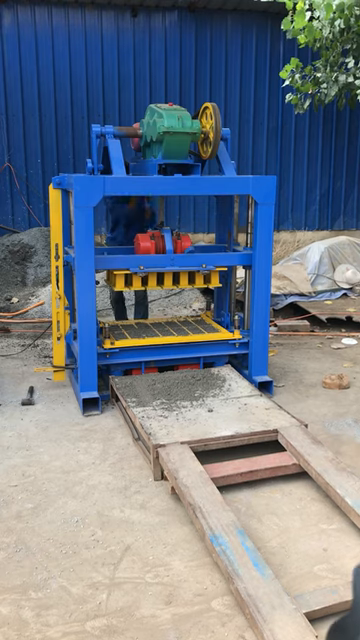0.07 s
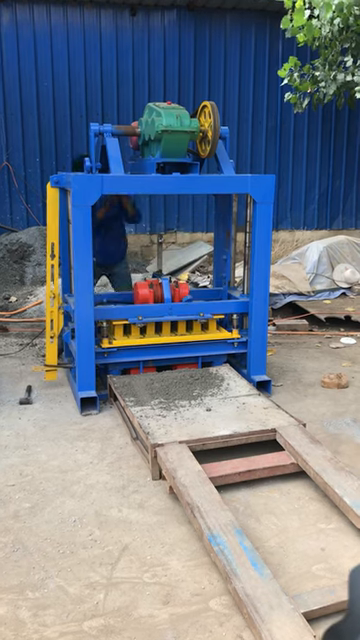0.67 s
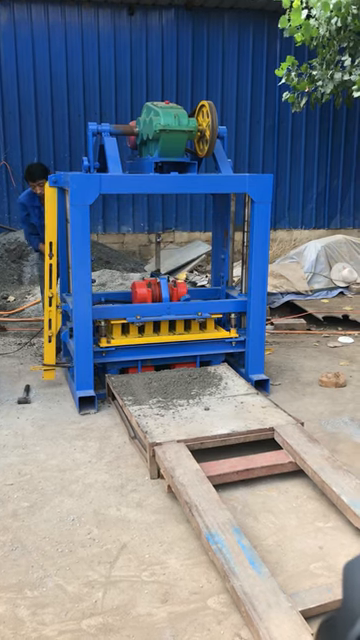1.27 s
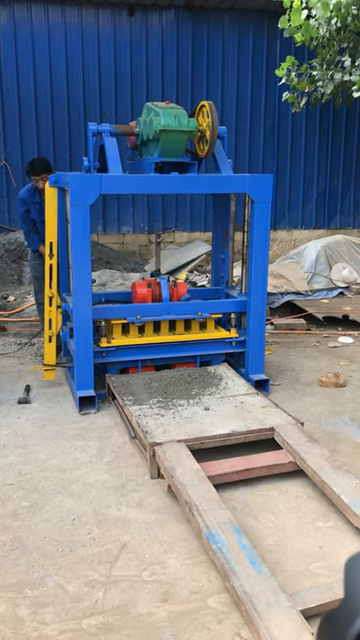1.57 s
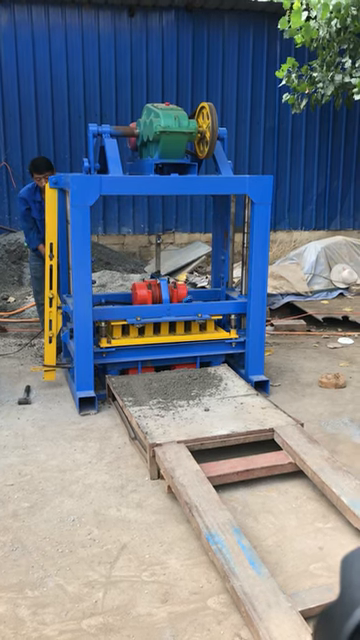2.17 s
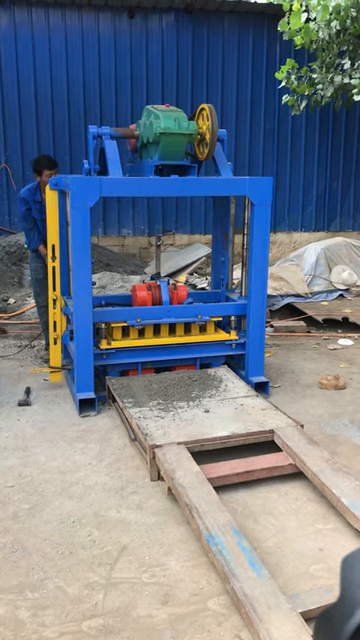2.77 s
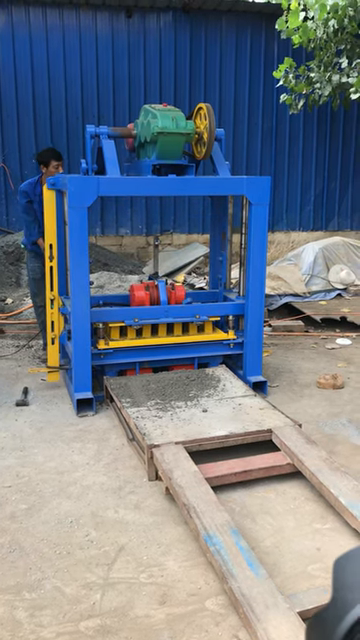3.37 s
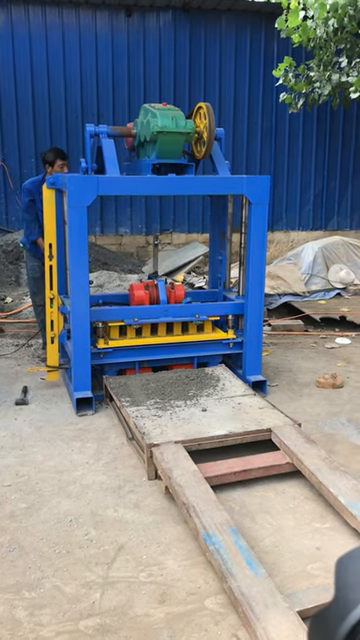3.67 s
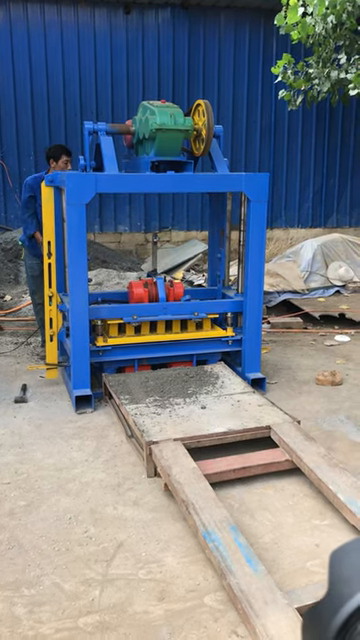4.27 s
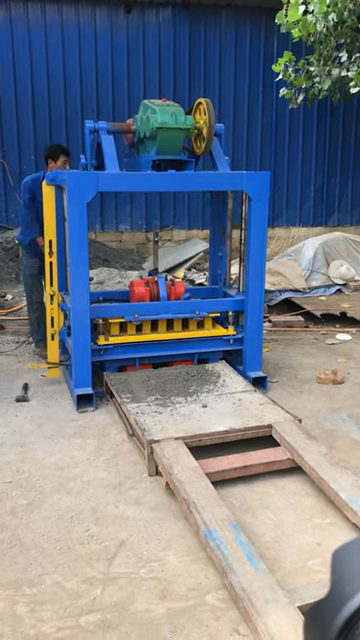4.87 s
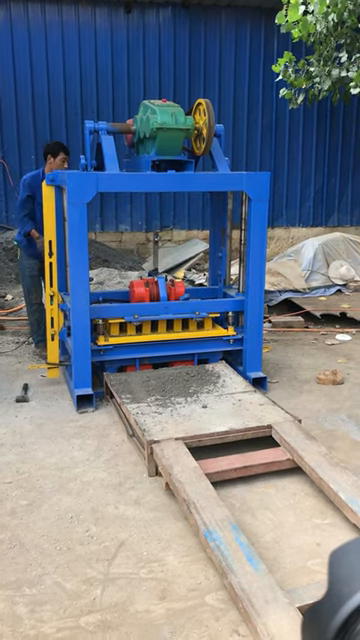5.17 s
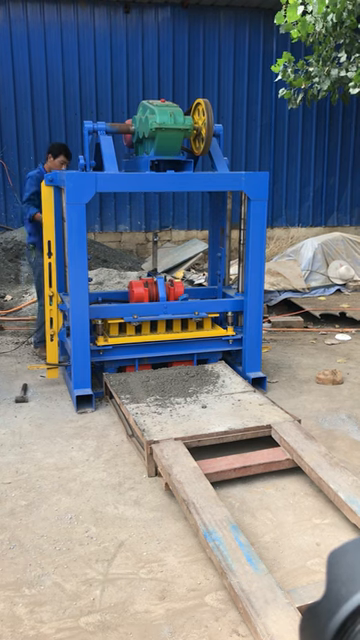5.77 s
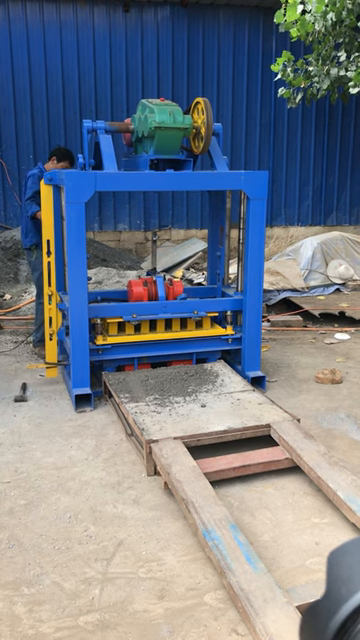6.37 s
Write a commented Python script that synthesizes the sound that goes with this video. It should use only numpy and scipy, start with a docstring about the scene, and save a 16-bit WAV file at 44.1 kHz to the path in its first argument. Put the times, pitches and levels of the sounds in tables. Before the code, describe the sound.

A catch clicks and a steel press head clanks against its guides, then crashes into the mould of a block machine at about 0.5 seconds with a low thud and a few ringing bounces. The ringing fades into faint outdoor noise and a low hum. Around 1.5 seconds, vibration motors start with a short rising scrape and several knocks. From 1.7 seconds they produce a loud, fast, hammering buzz, with steel parts chattering along. The buzz turns rougher, and from about 3.2 seconds the motors coast down, leaving looser rattling and irregular ringing knocks. A second short, loud burst of vibration comes at about 4.7 seconds. From 5 seconds it winds down again into thinning clatter and scattered clanks, still fading at the end, around 6.6 seconds. A short echo from the yard's metal fence follows the sounds.

```python
"""A yard with a concrete block machine. Its press head drops into the mould with steel clanks.
The vibration motors then run, coast down, get a second short burst and coast again. Their
off-centre weights slam the mould table once a turn and shake the loose parts of the frame,
which rattle, knock and ring. A sheet-metal fence echoes it all over faint outdoor noise."""
import sys
import numpy as np
from scipy import signal
from scipy.fft import rfft, irfft, next_fast_len
from scipy.io import wavfile
from scipy.ndimage import uniform_filter1d, minimum_filter1d, map_coordinates

SR = 44100
rng = np.random.default_rng(int(sys.argv[2]) if len(sys.argv) > 2 else 0)


def pcm_store(signal):
    """Save signal as 16-bit PCM."""
    levels = np.round(np.clip(np.atleast_2d(signal), -1, 1) * 32767)
    wavfile.write(sys.argv[1], SR, levels.astype(np.int16).T)


N = 291942
SWITCH_ON_S, FIRST_SLAM_S = 1.44, 1.675

# Motor speed. Each row: time in seconds, turns per second.
SPEED_HZ = [(1.5, 0), (1.6, 25), (1.675, 39), (1.73, 44), (1.76, 47.4), (3.15, 47.3), (3.25, 45), (3.5, 33),
            (4.0, 22.7), (4.5, 17), (4.6, 30), (4.7, 46), (4.87, 46.5), (5.05, 36), (5.5, 26), (6.1, 17),
            (6.62, 12.5)]

def shaft():
    """Turns made by the weights; a landing falls on each whole number."""
    turns = np.cumsum(curve(SPEED_HZ)) / SR
    return turns - turns[round(FIRST_SLAM_S * SR)] % 1

def in_step(start_s=1.818, beat_hz=5.2, slowing_s=0.302):
    """The motors beat ever more slowly: +1 pulling together, -1 opposed."""
    age_s = np.maximum(clock() - start_s, 0)
    return np.cos(2 * np.pi * beat_hz * slowing_s * np.log1p(age_s / slowing_s))

# Run-ups. Each row: peak time in seconds, boost in dB, then rise, hold and settling in seconds.
SURGES = [(1.663, 5, 0.044, 0.055, 0.75), (4.754, 7.5, 0.19, 0.061, 0.19)]

def surge_db():
    """Each run-up throws the machine hard before it settles."""
    t, boost_db = clock(), np.zeros(N)
    for peak_s, db, rise_s, hold_s, settle_s in SURGES:
        rise = np.clip(1 + (t - peak_s) / rise_s, 0, 1)
        boost_db += db * rise * np.exp(-np.maximum(t - peak_s - hold_s, 0) / settle_s)
    return boost_db

def shaken(law):
    """Gain of a part from speed and surge; it dies away when the shaking is too slow to lift it."""
    full_db, doubling_db, surge_share, stall_hz, stall_db_per_hz = law
    speed_hz = np.maximum(curve(SPEED_HZ), SPEED_HZ[-1][1])
    db = full_db + doubling_db * np.log2(speed_hz / speed_hz.max()) + surge_share * surge_db()
    db -= stall_db_per_hz * np.maximum(stall_hz - speed_hz, 0)
    return amp(db) * (clock() > SWITCH_ON_S)

def each_turn(turns, rise_s, t60_s, scatter_db, steady):
    """Envelope of rms 1 that jumps at each landing and decays over a steady floor."""
    age_s = turns % 1 / np.maximum(curve(SPEED_HZ), 1)
    strength = amp(scatter_db * rng.standard_normal(N))[np.floor(turns).astype(int)]
    pulses = strength * (1 - np.exp(-age_s / rise_s)) * amp(-60 * age_s / t60_s)
    return unit(unit(pulses) + steady)

# Unusual landings. Each row: time in seconds, gain in dB.
ACCENTS = [(1.685, 5.5), (1.71, 6), (2.598, 5), (2.687, 2), (2.728, 2.5), (2.96, 4.5), (3.107, 2.5),
           (3.128, 3.5), (3.17, 0), (3.41, 4), (3.49, 5), (4.93, -6), (4.955, 4), (5.003, 2.5),
           (5.058, 3.5)]

def accents(turns):
    """Gain held for the whole turn when the table lands harder or softer than usual."""
    turn = np.floor(turns)
    return amp(sum(db * (turn == turn[round(s * SR)]) for s, db in ACCENTS))

# Unevenness of the landings. Each row: time in seconds, roughness from 0 to 1.
UNEVENNESS = [(1.68, .7), (1.77, .06), (2.5, .04), (2.65, .16), (2.85, .14), (3.1, .55), (3.4, .9),
              (4.7, .6), (4.85, .45), (5.2, .9)]
# Resonances of the table plate and the heavy base. Each row: centre in Hz, width in Hz, level in dB.
PLATE_MODES = [(545, 52, 2.5), (610.4, 42, -4.5), (667.5, 37, 5.5), (700, 10, -5.5), (840, 77, 0.5)]
BASE_MODES = [(160, 24, -8.5), (296, 37, 0.5), (354, 29, -11)]
# Response to the motors. Each law: level at full speed in dB, dB per doubling of speed,
# surge factor, stall speed in Hz, dB lost per Hz below it.
PLATE_LAW = (-25.5, 23.5, 1.27, 31.5, 20)
BASE_LAW = (-25.5, 15.5, 1.1, 34.5, 3.5)

def mould_table(turns, lag_s=0.00368, jitter_s=0.00027, rebound_share=0.43, heave_db=1.5, tip_db=0.2):
    """One slam a turn, part clean blow and part scattered rebounds, rings the table and its base."""
    turns = turns - lag_s * curve(SPEED_HZ)  # the heavy table trails the light parts
    landings = np.flatnonzero(np.diff(np.floor(turns)) > 0)
    lateness, strength_db = rng.standard_normal((len(landings), 2)).T
    landings += np.round(lateness * jitter_s * SR).astype(int)
    blows = np.zeros(N)
    blows[np.clip(landings, 0, N - 1)] = amp(strength_db)
    rebounds = each_turn(turns, rise_s=0.0058, t60_s=0.07, scatter_db=2.2, steady=0.12)
    rebounds *= rng.standard_normal(N)
    force = np.sqrt(1 - rebound_share) * unit(blows) + np.sqrt(rebound_share) * rebounds
    # the plate radiates little outside its own band
    plate = shaped(force, lambda hz: resonances(PLATE_MODES, hz) * band(hz, 583, width_hz=137))
    base = shaped(rebounds * np.sqrt(curve(UNEVENNESS)),
                  lambda hz: resonances(BASE_MODES, hz) * band(hz, 231, width_hz=700))
    # in step the motors heave the base; out of step they tip the table
    heave, tip = amp(heave_db * in_step()), amp(-tip_db * in_step())
    return accents(turns) * (shaken(PLATE_LAW) * tip * plate + shaken(BASE_LAW) * heave * base)

# Shaking force. Each row: multiple of the motor speed, relative level in dB.
FORCE_HARMONICS = [(1, -41), (2, -44), (3, -33), (4, -32), (5, -32), (6, -25), (7, -31), (8, -35), (9, -42),
                   (10, -39)]

def weights(turns, level_db=-3, beat_db=3.0, surge_share=1.38):
    """The unbalanced force falls steeply as the motors slow; its overtones need even landings."""
    speed_hz, evenness = curve(SPEED_HZ), 1 - curve(UNEVENNESS)
    pull = amp(level_db + beat_db * in_step() + surge_share * surge_db())
    pull *= (speed_hz / speed_hz.max()) ** 6
    return pull * sum(amp(db) * (evenness if k > 1 else 1) * np.sin(2 * np.pi * (k * turns + rng.random()))
                      for k, db in FORCE_HARMONICS)

# Spectrum of the loose parts. Each row: frequency in Hz, relative level in dB.
PARTS_SPECTRUM = [(350, -29.5), (520, -5), (640, 3.5), (850, -6), (1200, -1), (1700, -9), (2200, -5),
                  (3000, -12), (3900, -16), (5000, -23.5), (8000, -43.5), (15500, -68)]
# Frame resonances. Each row: centre in Hz, width in Hz, level in dB.
FRAME_MODES = [(894, 98, 0.5), (1250, 4.3, 6.5), (1337, 67, -4.5), (1550, 160, 6), (1712, 56, 8.5),
               (2070, 62, 3), (2315, 31, 1.5), (2830, 13, 5), (3130, 40, 4), (3720, 14, 4)]

def steel(hz, ring_db=-3):
    """Broad colour of the loose parts with the frame's resonances on top."""
    return spectrum(PARTS_SPECTRUM, hz) * (1 + amp(ring_db) * resonances(FRAME_MODES, hz))

def steel_ripple(depth_db, spacing_hz=60):
    """Fine ripple against frequency: the many small resonances of welded steel."""
    grid_hz = np.arange(0, SR / 2, spacing_hz)
    treble = np.clip(grid_hz / 2500 - 0.5, 0, 1)
    gain = amp(depth_db * rng.standard_normal(SR // 10)[:len(grid_hz)] * treble)
    gain /= np.sqrt(uniform_filter1d(gain ** 2, size=7))
    return lambda hz: np.interp(hz, grid_hz, gain)

# Spectrum of sharp steel edges. Each row: frequency in Hz, relative level in dB.
EDGE_SPECTRUM = [(1760, -17), (3000, -4.5), (4880, -13.5), (5570, -10), (7670, -21.5), (9000, -20.5),
                 (10300, -27), (12700, -24.5), (15800, -33)]
# Response of the parts and their edges to the motors; columns as in PLATE_LAW.
RATTLE_LAW = (-27, 5.5, 1.55, 17.5, 1.5)
EDGE_LAW = (-35, 18, 1.23, 26, 10)

def loose_parts(turns, flutter_db=0.76, edge_steady=0.2, accent_share=0.35):
    """Steel parts chatter in time with the table at speed, and tumble freely as it slows."""
    locked = np.clip((curve(SPEED_HZ) - 27) / 17, 0, 1)
    chatter = each_turn(turns, rise_s=0.0025, t60_s=0.06, scatter_db=1.0, steady=0.3)
    tumble = each_turn(turns, rise_s=0.0052, t60_s=0.75, scatter_db=2.7, steady=0.9)
    tumble *= amp(flutter_db * wobble(rate_hz=16))
    drive = np.sqrt(locked * chatter ** 2 + (1 - locked) * tumble ** 2) * accents(turns) ** accent_share
    ripple = steel_ripple(depth_db=3.5)
    rattle = shaped(shaken(RATTLE_LAW) * drive * contacts(per_s=5000), lambda hz: steel(hz) * ripple(hz))
    # edges meet when the parts are thrown hard, and keep jingling between slams
    jingle = shaken(EDGE_LAW) * unit(drive + edge_steady) * contacts(per_s=13000)
    return rattle + shaped(jingle, lambda hz: spectrum(EDGE_SPECTRUM, hz) * ripple(hz))

# Spectrum of the rocking frame. Each row: frequency in Hz, relative level in dB.
ROCK_SPECTRUM = [(25, -11), (45, -14), (80, -0.5), (110, -5), (180, 4), (290, 0.5), (420, -6.5), (600, 3.5),
                 (1200, -62.5)]
# Its response to the motors; columns as in PLATE_LAW.
ROCK_LAW = (-39, -2, 0.9, 17.5, 2.5)

def frame_rocking():
    """Uneven landings rock the whole frame on its feet."""
    force = shaken(ROCK_LAW) * np.sqrt(curve(UNEVENNESS)) * rng.standard_normal(N)
    return shaped(force, lambda hz: spectrum(ROCK_SPECTRUM, hz))

# Modes of catch, guides, head and frame boom. Each row: frequency in Hz, level in dB, T60 in seconds.
CATCH_MODES = [(735, 4.5, 0.36), (1140, 10, 0.059), (1810, 2, 0.54), (2100, 2, 0.26), (2850, -5, 0.31),
               (3680, -22, .22), (4520, 0.5, 0.12), (5760, 0, 0.33), (8300, -17, 0.27), (9700, -16, 0.48),
               (12240, -12, 0.25), (14870, -24, .28)]
GUIDE_MODES = [(575, -0.5, 0.27), (639, -1, 0.26), (1163, -14, 0.4), (1600, -5, 0.086)]
HEAD_MODES = [(991, 9, 0.22), (1065, -11, 2.1), (1120, -15, 0.7), (1330, 3, 0.4), (1402, 10, 0.28),
              (1340, 3, 0.19), (2360, -12, 0.66), (2900, -13, 0.23), (3270, -3, 0.23), (3896, 6.5, 0.16),
              (6002, -20, 0.18), (7260, -21, 0.8), (9960, -7.5, 0.27), (14714, -21, .3)]
BOOM_MODES = [(80, -3, 0.23), (109, -2, 0.14), (144, -3, 0.08)]
# Hits on them. Each row: start in seconds, level in dB.
CATCH_HITS = [(0.083, -32)]
GUIDE_HITS = [(0.158, -18.5), (0.58, -16.5), (1.378, -35.5)]
HEAD_HITS = [(0.249, -22.5), (0.474, -34), (0.611, -26)]
BOOM_HITS = [(0.51, -13.5)]

def press_rings():
    """Catch, guides and head ring when struck; the frame booms as the head lands."""
    clanks = ring(CATCH_MODES, CATCH_HITS) + ring(GUIDE_MODES, GUIDE_HITS) + ring(HEAD_MODES, HEAD_HITS)
    return clanks + ring(BOOM_MODES, BOOM_HITS, attack_s=0.006, blur_hz=3)

# Blows of the head. Each row: start in seconds, crash in dB, thud in dB,
# treble tilt in dB per octave, rise in seconds, T60 in seconds.
HEAD_BLOWS = [(0.157, -25.5, -38, -12, 0.0085, 0.65), (0.248, -5.5, -53, -1.5, 0.00064, 0.2),
              (0.458, -10, -12, -4.5, 0.012, 0.29), (0.474, -15.5, -23.5, -1, 0.0051, 0.23),
              (0.503, 8, -4, -7, 0.0011, 0.034), (0.575, -16.5, -21, -5.5, 0.0072, 0.3),
              (0.610, -9.5, -20.5, -1.5, 0.00039, 0.23), (0.645, -12.5, -42, -6.5, 0.0016, 0.23)]
# Spectra of a blow. Each row: frequency in Hz, relative level in dB.
CRASH_SPECTRUM = [(350, -27), (600, -19.5), (845, -14.5), (996, -13), (1140, -8.5), (1420, -8),
                  (1770, -8.5), (4130, -14), (4870, -18), (5820, -17), (7760, -25.5), (9790, -25),
                  (15800, -28)]
THUD_SPECTRUM = [(18, -45), (30, -13), (90, 3.5), (140, -1.5), (241, -1), (328, 0), (395, -17), (572, 0),
                 (909, -16.5), (1200, -27), (1560, -37), (2640, -120)]

def press_blows(catch_db=-33.5):
    """The catch lets go; the head knocks on its guides, crashes into the mould and bounces."""
    release = burst(CATCH_HITS[0][0], rise_s=0.0003, t60_s=0.36) * rng.standard_normal(N)
    crashes = amp(catch_db) * shaped(release, lambda hz: np.sqrt(spectrum(CRASH_SPECTRUM, hz)))
    thuds, ripple = np.zeros(N), steel_ripple(depth_db=2.0)
    for start_s, crash_db, thud_db, tilt_db, rise_s, t60_s in HEAD_BLOWS:
        blow = burst(start_s, rise_s, t60_s)
        tilt = lambda hz: amp(tilt_db * np.log2(1 + hz / 1500))  # softer contacts excite less treble
        colour = lambda hz: spectrum(CRASH_SPECTRUM, hz) * tilt(hz) * ripple(hz)
        crashes += amp(crash_db) * shaped(blow * rng.standard_normal(N), colour)
        thuds += amp(thud_db) * blow
    return crashes + shaped(thuds * rng.standard_normal(N), lambda hz: spectrum(THUD_SPECTRUM, hz))

# Knocks of loose parts. Each row: start in seconds, relative level in dB, ring frequency in Hz.
KNOCKS = [(1.546, -18.5, 1137), (1.581, -12, 1657), (1.632, -10, 1120), (1.661, -4, 1647),
          (2.723, -17, 1380), (2.911, -12, 1495), (2.955, -18, 880), (3.098, -15, 870), (3.247, -12, 846),
          (3.396, -31, 1560), (3.578, -27, 1780), (3.853, -14, 1700), (3.948, -15.5, 991),
          (3.981, -12.5, 1674), (4.085, -13.5, 1700), (4.12, -14, 990), (4.154, -17.5, 1720),
          (4.188, -17, 985), (4.227, -15.5, 1690), (4.247, -13, 1250), (4.362, -14.5, 1027),
          (4.386, -17, 1710), (4.414, -14, 1693), (4.506, -19, 1636), (4.559, -16.5, 1065),
          (5.172, -13, 1313), (5.429, -18.5, 1320), (5.459, -17, 2000), (5.579, -18.5, 2080),
          (5.635, -15, 1624), (5.763, -17, 703), (5.831, -13, 1000), (5.908, -17.5, 1290),
          (5.993, -22, 985), (6.029, -13.5, 1470), (6.068, -17, 1334), (6.127, -15.5, 1600),
          (6.374, -16.5, 2116), (6.438, -23, 1230)]
# Light clicks. Each row: start in seconds, level in dB.
CLICKS = [(1.377, -39), (1.4, -41), (1.702, -33), (1.725, -26), (3.245, -36), (3.565, -37), (3.63, -42),
          (3.78, -42), (3.975, -38.5), (4.518, -36.5), (4.775, -27), (5.183, -34), (5.46, -40),
          (5.6, -41.5), (5.865, -47), (6.135, -47)]

def knocks(hit_db=-9, rebound_db=-21, ring_db=-11, ring_t60_s=0.23):
    """Parts knock on the frame, rebound and ring at their own pitch; small ones click more brightly."""
    blows = sum(amp(db + hit_db) * burst(s, rise_s=0.00076, t60_s=0.08)
                + amp(db + rebound_db) * burst(s, rise_s=0.012, t60_s=0.49) for s, db, _ in KNOCKS)
    clanks = shaped(blows * contacts(per_s=10000), lambda hz: steel(hz, ring_db=-0.5))
    taps = sum(amp(db) * burst(s, rise_s=0.00014, t60_s=0.22) for s, db in CLICKS)
    clicks = shaped(taps * contacts(per_s=3400), lambda hz: spectrum(EDGE_SPECTRUM, hz) * (1 + hz / 4000))
    rings = sum(ring([(hz, ring_db, ring_t60_s)], [(s, db)], blur_hz=60) for s, db, hz in KNOCKS)
    return clanks + clicks + rings

# Start-up rubs. Each row: peak time and half-width in seconds, level in dB, centre and width in Hz.
RUBS = [(1.514, 0.089, -40, 620, 300), (1.538, 0.03, -40, 930, 250), (1.568, 0.016, -29, 1260, 700)]

def motor_rub():
    """The motors rub as they start: a scrape that climbs in pitch."""
    out = np.zeros(N)
    for peak_s, half_width_s, db, centre_hz, width_hz in RUBS:
        swell = amp(db) * np.exp(-((clock() - peak_s) / half_width_s) ** 2)
        colour = lambda hz: band(hz, centre_hz, width_hz) * band(hz, centre_hz, 2 * centre_hz)
        out += shaped(swell * contacts(per_s=7500), colour)
    return out

# Whistle of the sliding head. Each row: time in seconds, pitch in Hz, level in dB.
WHISTLE = [(0.37, 5500, -62), (0.4, 5950, -49), (0.45, 7500, -46), (0.465, 7900, -62)]

def head_slide(jitter=0.22):
    """Steel running on steel: a faint, unsteady whistle that rises as the head gathers speed."""
    pitch_hz = curve(WHISTLE) * (1 + jitter * rng.standard_normal(N))
    return amp(curve(WHISTLE, column=2, outside=-120)) * np.sin(2 * np.pi * np.cumsum(pitch_hz) / SR)

# Echo decay. Each row: frequency in Hz, T60 in seconds.
YARD_T60 = [(150, 0.73), (1200, 1), (4000, 0.86), (14000, 0.77)]

def yard_echo(x, delay_s=0.01292):
    """The sheet-metal fence and the frame keep each sound alive, the midrange longest."""
    hz, t, noise = signal.stft(rng.standard_normal(SR), SR, nperseg=256)
    decay = amp(-60 * t / along(YARD_T60, hz)[:, None])
    tail = signal.istft(noise * decay, SR, nperseg=256)[1]
    tail[:round(delay_s * SR)] = 0
    return signal.fftconvolve(x, tail / np.linalg.norm(tail))[:N]

# Outdoor noise. Each row: frequency in Hz, relative level in dB.
AIR_SPECTRUM = [(25, -17), (50, -15), (80, -15.5), (130, -17.5), (220, -20.5), (600, -25.5), (1100, -25),
                (3400, -30), (4900, -38.5), (7100, -35.5), (8000, -42.5), (15500, -48.5)]

def background(level_db=-45.5, hum_hz=42):
    """Outdoor noise, with a low hum until the first slam."""
    air = shaped(rng.standard_normal(N), lambda hz: spectrum(AIR_SPECTRUM, hz))
    hum = np.sin(2 * np.pi * hum_hz * clock()) * (clock() < FIRST_SLAM_S)
    return amp(level_db) * (air + hum)

def ring(modes, hits, attack_s=0.00023, blur_hz=7):
    """Decaying modes, new at every hit; loose joints make their phases drift."""
    out, t = np.zeros(N + SR), np.arange(SR) / SR
    for start_s, hit_db in hits:
        for hz, mode_db, t60_s in modes:
            phase = 2 * np.pi * (hz * t + rng.random())
            drift = np.cumsum(rng.standard_normal(SR)) * np.sqrt(2 * np.pi * blur_hz / SR)
            decay = amp(hit_db + mode_db + rng.standard_normal() - 60 * t / t60_s)
            out[round(start_s * SR):][:SR] += decay * np.sin(phase + drift) * (1 - np.exp(-t / attack_s))
    return out[:N]

def burst(start_s, rise_s, t60_s):
    """Envelope of one blow."""
    out, t = np.zeros(N + SR), np.arange(SR) / SR
    out[round(start_s * SR):][:SR] = (1 - np.exp(-t / rise_s)) * amp(-60 * t / t60_s)
    return out[:N]

def contacts(per_s):
    """Random tiny impacts of either sign, rms 1."""
    return unit(rng.standard_normal(N) * (rng.random(N) < per_s / SR))

def wobble(rate_hz):
    """Smooth random curve."""
    return map_coordinates(rng.standard_normal(int(N * rate_hz / SR) + 4), [clock() * rate_hz])

def band(hz, centre_hz, width_hz):
    """Gain of one resonance, 1 at its centre."""
    return np.abs(hz * width_hz / (centre_hz ** 2 - hz ** 2 + 1j * hz * width_hz))

def resonances(modes, hz):
    """Gain of several resonances, summed in power."""
    return np.sqrt(sum((amp(db) * band(hz, centre, width)) ** 2 for centre, width, db in modes))

def coloured(x, gain):
    """Minimum-phase filter with the response gain(hz)."""
    size = 2 * next_fast_len(N // 2 + SR // 4)
    cepstrum = irfft(np.log(np.maximum(gain(np.fft.rfftfreq(size, 1 / SR)), 1e-6)))
    cepstrum[1:size // 2] *= 2
    cepstrum[size // 2 + 1:] = 0
    return irfft(rfft(x, size) * np.exp(rfft(cepstrum)), size)[:N]

def shaped(x, gain):
    """Filter scaled to keep the power of white noise."""
    rms_gain = np.sqrt(np.mean(gain(np.fft.rfftfreq(SR, 1 / SR)) ** 2))
    return coloured(x, lambda hz: gain(hz) / rms_gain)

def along(points, hz):
    """Interpolate (Hz, value) points on a log axis."""
    points_hz, values = np.transpose(points)
    return np.interp(np.log(hz + 1), np.log(points_hz + 1), values)

def spectrum(points, hz):
    """Gain from (Hz, dB) points."""
    return amp(along(points, hz))

def curve(rows, column=1, outside=None):
    """One column of a time table, per sample."""
    rows = np.asarray(rows)
    return np.interp(clock(), rows[:, 0], rows[:, column], outside, outside)

def clock():
    """Sample times in seconds."""
    return np.arange(N) / SR

def amp(db):
    """Decibels to gain."""
    return 10 ** (np.asarray(db) / 20)

def unit(x):
    """Scale to rms 1."""
    return x / np.sqrt(np.mean(x ** 2) + 1e-20)

def scene(head_echo_db=-15, vibration_echo_db=-12):
    """The machine, its echo and the yard."""
    turns = shaft()
    head = press_rings() + press_blows() + head_slide()
    vibration = mould_table(turns) + loose_parts(turns) + frame_rocking() + knocks() + motor_rub()
    drone = weights(turns)
    echo = yard_echo(amp(head_echo_db) * head + amp(vibration_echo_db) * vibration)
    return (head + vibration + drone + echo + background())[None]

def record(dry, ceiling=0.74, low_cut_hz=34, top_hz=15850, opens_s=0.036):
    """Low cut, a brief opening silence, a fast peak limiter and a steep treble cut."""
    x = coloured(dry[0], lambda hz: 1 / np.sqrt(1 + (low_cut_hz / (hz + 1)) ** 8))
    x *= clock() > opens_s
    limiter_gain = np.minimum(1, ceiling / (np.abs(x) + 1e-9))
    x *= uniform_filter1d(minimum_filter1d(limiter_gain, size=100), size=100)
    return irfft(rfft(x) * (np.fft.rfftfreq(N, 1 / SR) < top_hz), N)[None]

dry = scene()
out = record(dry)
pcm_store(out)
```